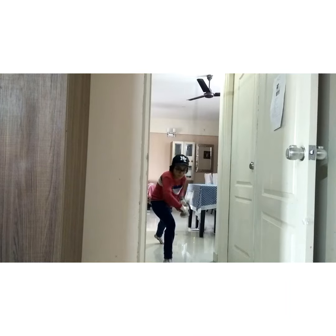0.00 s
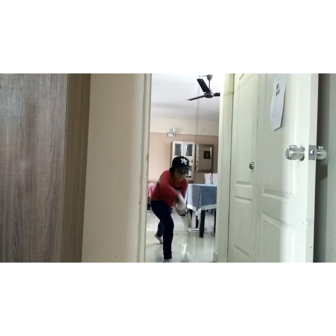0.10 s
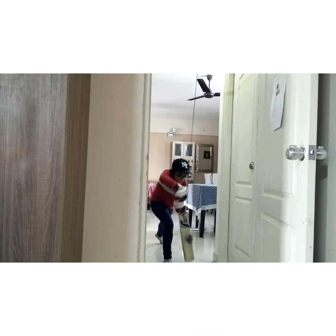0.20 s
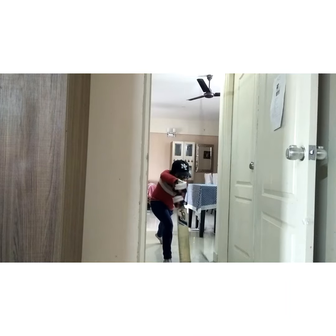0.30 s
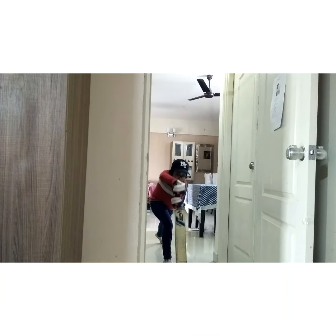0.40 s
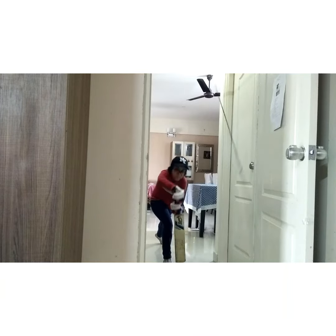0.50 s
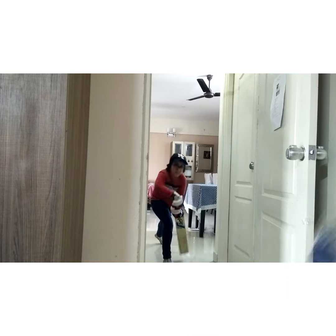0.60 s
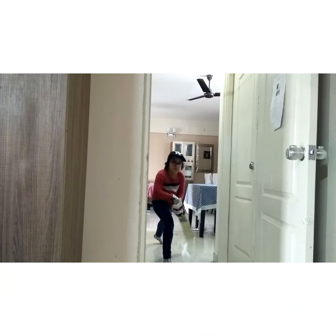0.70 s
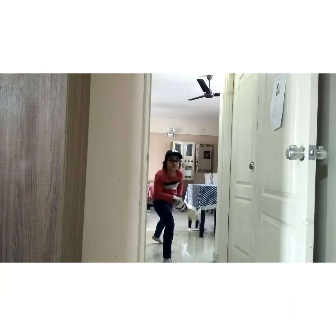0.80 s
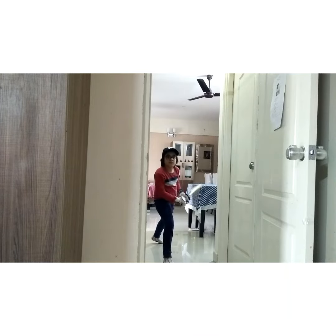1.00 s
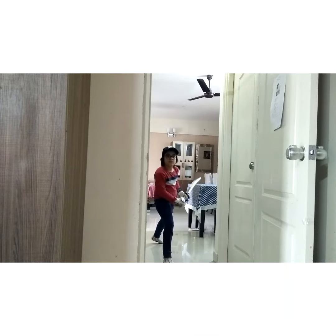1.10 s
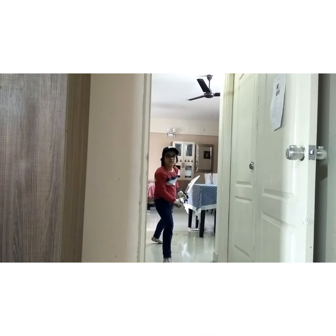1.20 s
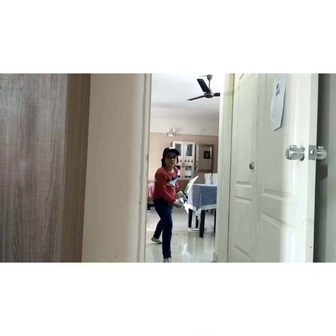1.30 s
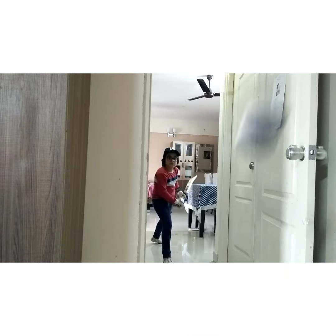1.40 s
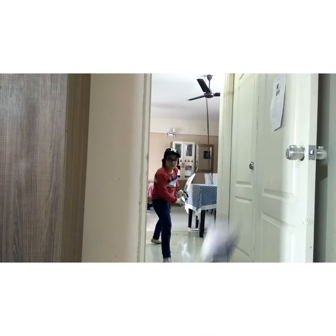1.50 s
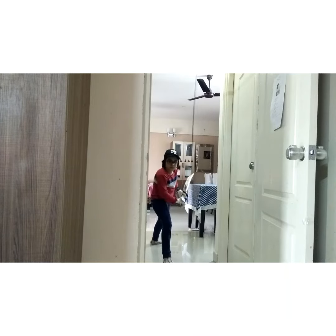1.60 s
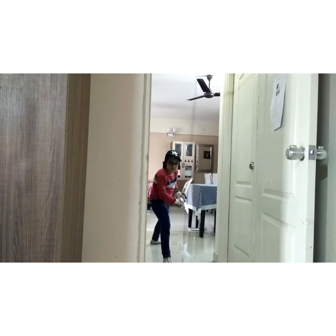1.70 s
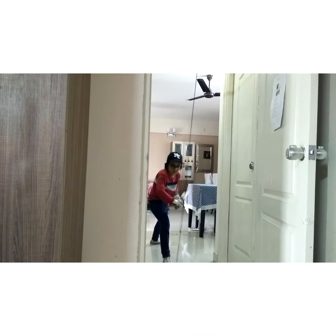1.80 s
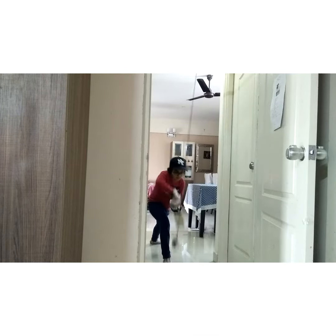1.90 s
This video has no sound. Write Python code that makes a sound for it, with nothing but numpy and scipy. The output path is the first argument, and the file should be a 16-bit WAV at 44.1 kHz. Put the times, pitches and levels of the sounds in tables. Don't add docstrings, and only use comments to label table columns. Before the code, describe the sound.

A wooden cricket bat hits a hard ball on a string once, near the start, with a sharp knock, quick wall echoes and a hollow ringing tail in a tiled home, heard from two rooms away; then near quiet.

```python
import sys
import numpy as np
from scipy import signal
from scipy.io import wavfile

SR = 44100
rng = np.random.default_rng(int(sys.argv[2]) if len(sys.argv) > 2 else 0)


def magnitude_from_level(level_db):
    exponent = np.asarray(level_db, float) / 20
    return 10 ** exponent


def dump(signal):
    limited = np.clip(np.atleast_2d(signal).T, -1, 1)
    pcm = np.round(limited * 32767).astype(np.int16)
    wavfile.write(sys.argv[1], SR, pcm)


N = 83790
T = np.arange(N) / SR
KNOCK_S = 0.24655


def rms_one(x):
    return x / np.sqrt(np.mean(x ** 2) + 1e-20)


def at_hz(points, hz):
    table_hz, values = np.transpose(points)
    return np.interp(np.log(hz), np.log(table_hz), values)


def butter(x, order, hz, kind="low"):
    return signal.lfilter(*signal.butter(order, hz, kind, fs=SR), x)


def swell(start, rise, t60):
    age = np.maximum(T - start, 0)
    return (1 - np.exp(-age / rise)) * magnitude_from_level(-60 * age / t60)


def ring(x, hz, t60):
    r = magnitude_from_level(-60 / (t60 * SR))
    w = 2 * np.pi * hz / SR
    return signal.lfilter([0, np.sin(w)], [1, -2 * r * np.cos(w), r * r], x + 1e-18)


def peak(x, hz, width_hz):
    r = np.exp(-np.pi * width_hz / SR)
    poles = [1, -2 * r * np.cos(2 * np.pi * hz / SR), r * r]
    return signal.lfilter([(1 - r * r) / 2, 0, (r * r - 1) / 2], poles, x)


# frequency in Hz, likeness from 0 to 1.
PORT_LIKENESS = [(60, .97), (290, .92), (640, 1), (1400, 0.2), (3100, 0.0)]


def bands():
    edges = 25 * 2 ** np.arange(0, 9.6, 1 / 3)
    white = rng.standard_normal((2, 2, N + 9000))
    for k, (low, high) in enumerate(zip(edges, edges[1:])):
        band = signal.butter(2, [low, high], "band", fs=SR, output="sos")
        mid, side = signal.sosfilt(band, white[k % 2])[:, -N:]
        hz = np.sqrt(low * high)
        alike = np.clip(at_hz(PORT_LIKENESS, hz), -1, 1)
        yield hz, np.sqrt(1 + alike) * mid + np.sqrt(1 - alike) * side * [[1], [-1]]


# frequency in Hz, density in dB per Hz.
RUMBLE_COLOUR = [(28, -28.5), (45, 2), (90, 0), (170, -2.5), (300, -5.5), (700, -13), (2200, -26),
                 (12000, -38)]
# time in seconds, level in dB.
RUMBLE_LEVEL = [(0, -58.5), (.3, -63), (.8, -59), (1.05, -61), (1.2, -62), (1.35, -57.5), (1.5, -60),
                (1.7, -57.5), (1.9, -59.5)]


def rumble():
    lumps_db = 2.2
    level_db = np.interp(T, *np.transpose(RUMBLE_LEVEL))
    out = 0
    for hz, noise in bands():
        lumps = np.interp(T, np.linspace(0, T[-1], num=30), rng.standard_normal(30))
        swing_db = level_db + 62.5 + lumps_db * lumps
        out = out + magnitude_from_level(at_hz(RUMBLE_COLOUR, hz) + swing_db / (1 + hz / 2500)) * noise
    return magnitude_from_level(-61.5) * rms_one(out)


# start in seconds, level in dB, pitch in Hz, rise in seconds, t60 in seconds.
TICKS = [
    (.674, -61, 3700, .003, .07),
    (.82, -64, 3700, .002, .06),
    (.03, -61, 510, .05, .7),
]


def ticks():
    out = 0
    for start, db, hz, rise, t60 in TICKS:
        out = out + magnitude_from_level(db) * swell(start, rise, t60) * np.sin(2 * np.pi * hz * T)
    return out


# frequency in Hz, level in dB, t60 in seconds.
BLADE_MODES = [(215, 1, 0.0073), (630, -12.5, 0.037), (1500, -14, 0.016), (2306, -13, 0.012),
               (3600, -10.5, 0.012), (6330, -14.5, .006), (9050, -20.5, .012)]
# delay in seconds, level in dB, signed strength from -1 to 1.
WALL_ECHOES = [(.0072, -9, -1), (.0088, -11.5, 1), (0.0123, -9, 0.82), (0.0151, -6.5, -1),
               (.0188, -6.5, -1), (.0235, -11, -0.71), (.0335, -13.5, 1), (.041, -13.5, -1),
               (.046, -14, 0.22), (.077, -18.5, 1)]


def knock():
    knock_db, contact_s = -3, 0.00055
    crack_db, crack_s, crack_cut_hz = -10.5, 0.0035, 6300
    echo_dull_db_per_s = 152
    direct = (0.000094, 0.0031, 0.98)
    out = np.zeros(N)
    for delay, db, sign in [direct, *WALL_ECHOES]:
        age = T - KNOCK_S - delay
        body = -np.sin(np.pi * np.clip(age / contact_s, 0, 1))
        click = np.diff(1.0 * (age > 0), prepend=0)
        for hz, mode_db, t60 in BLADE_MODES:
            detune = rng.uniform(0.93, 1.07) ** (delay > 0)
            body = body - magnitude_from_level(mode_db) * ring(click, hz * detune, t60)
        fade = (age > 0) * np.exp(-(np.maximum(age, 0) / crack_s) ** 2)
        crack = magnitude_from_level(crack_db - echo_dull_db_per_s * delay) * rng.standard_normal(N) * fade
        out += sign * magnitude_from_level(knock_db + db) * (body + butter(crack, 2, crack_cut_hz))
    return butter(out, 2, 130, "high")


# frequency in Hz,
# level in dB, t60 in seconds.
RINGING_MODES = [(81.76, -18.5, 0.52), (154.7, -5, 0.15), (198, -10, 0.47), (228, -3.5, 0.39), (355, -4, 0.31),
                 (450, 2.5, .42), (516, -11, 0.34), (600, -8.5, 0.47), (629, -2, 0.53), (634.6, -5, 0.28),
                 (727, -1.5, .4), (763.3, -4.5, .4), (1490, -20, .45), (2518, -19.5, .4),
                 (1031, -20, .45), (1135, -32, 1.0), (1440, -26, .6), (1472, -20, .62), (1500, -22, .62),
            (700, -4, .5), (669, -7, .5), (253, -21, 1.2), (378, -13, 1.05), (387, -21, .8)]


def passage_modes():
    rise_s, spread_hz = 0.0052, 4900
    out = 0
    for hz, db, t60 in RINGING_MODES:
        turns = hz * T + rng.random()
        left_lead = hz / spread_hz * rng.uniform(-0.39, 0.65)
        phase = 2 * np.pi * (turns + left_lead * np.array([[1], [0]]))
        out = out + magnitude_from_level(db) * swell(KNOCK_S, rise_s, t60) * np.sin(phase)
    return magnitude_from_level(-17) * out


# frequency in Hz, density in dB per Hz.
REVERB_COLOUR = [(50, -22.5), (150, -9), (300, -12.5), (680, -3.5), (1200, -24), (1550, -14), (3000, -27.5),
                 (15000, -44.5)]
# frequency in Hz, t60 in seconds.
PASSAGE_T60 = [(60, 0.34), (250, 0.44), (700, 0.43), (2000, 0.22), (6000, 0.46), (14000, 0.29)]
# frequency in Hz, t60 in seconds.
FAR_T60 = [(60, 0.84), (300, 0.78), (1000, 0.67), (4000, 0.63), (9000, .4), (14000, 0.31)]


def reverb():
    build_s, reverb_db, far_db = 0.0019, -15, -7
    out = 0
    for hz, noise in bands():
        near = swell(KNOCK_S, build_s, at_hz(PASSAGE_T60, hz))
        far = swell(KNOCK_S, build_s, at_hz(FAR_T60, hz))
        out = out + magnitude_from_level(at_hz(REVERB_COLOUR, hz)) * np.hypot(near, magnitude_from_level(far_db) * far) * noise
    return magnitude_from_level(reverb_db + 19) * out


# start in seconds, level in dB, rise in seconds, t60 in seconds, centre in Hz.
RUSTLES = [
    (0.459, -63.5, 0.01, 0.22, 9300),
    (0.674, -73, .005, 0.17, 9110),
    (.815, -76, 0.0048, .25, 8230),
    (1.478, -71.5, 0.014, 0.14, 1400),
    (1.735, -66, .04, 0.22, 7400),
    (1.735, -65, .04, 0.22, 14000),
    (1.62, -58.5, 0.091, 1.3, 75),
]


def rustles():
    out = 0
    for start, db, rise, t60, hz in RUSTLES:
        grain = peak(rng.standard_normal((2, N)), hz, 0.3 * hz)
        out = out + magnitude_from_level(db + 10) * swell(start, rise, t60) * grain
    return out


def scene():
    return knock() + passage_modes() + reverb() + rustles() + ticks() + rumble()


def muffled_left(x):
    x = x - 0.55 * peak(x, 760, 900)
    cover = signal.ellip(4, 1, 34, 4800, fs=SR, output="sos")
    return magnitude_from_level(-1.3) * signal.sosfilt(cover, x)


def resonant_right(x):
    whine = magnitude_from_level(-76.5) * np.sin(2 * np.pi * 6960 * T)
    return x + magnitude_from_level(12) * peak(x, 6940, 2600) - 0.5 * peak(x, 4700, 400) + whine


def hiss():
    return magnitude_from_level(-74.5) * signal.lfilter([1, -0.3], [1], rng.standard_normal((2, N)))


def roll_off(x):
    return signal.sosfilt(signal.butter(12, 16850, fs=SR, output="sos"), x)


def record(dry):
    ceiling, cutoff_hz = 1.3, 15850
    left, right = butter(dry, 2, 48, "high")
    x = np.array([muffled_left(left), resonant_right(right)]) + hiss()
    x = ceiling * np.tanh(x / ceiling)
    x = signal.sosfilt(signal.ellip(10, 0.5, 60, cutoff_hz, fs=SR, output="sos"), x)
    return roll_off(x)


dry = scene()
out = record(dry)
dump(out)
```